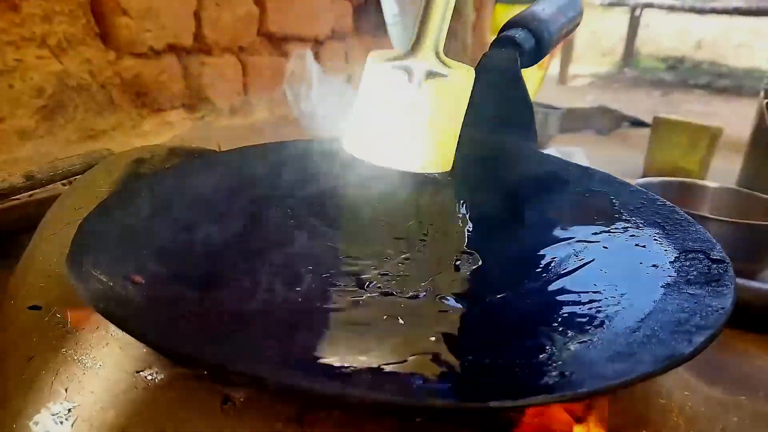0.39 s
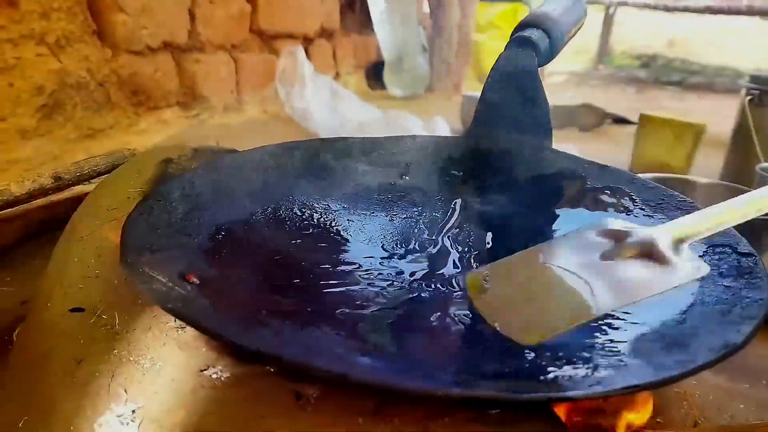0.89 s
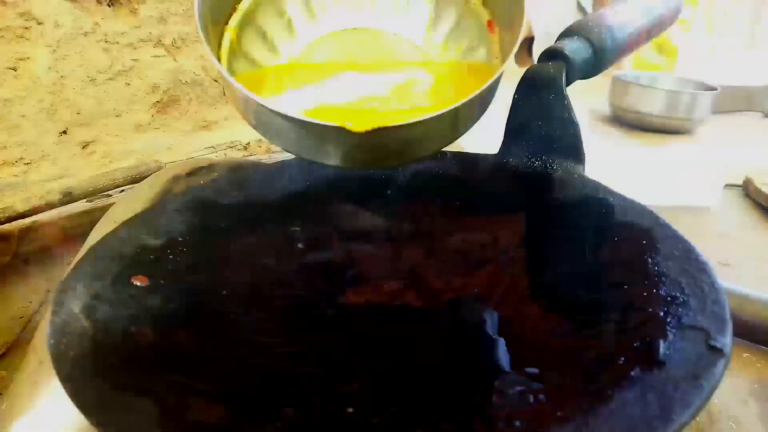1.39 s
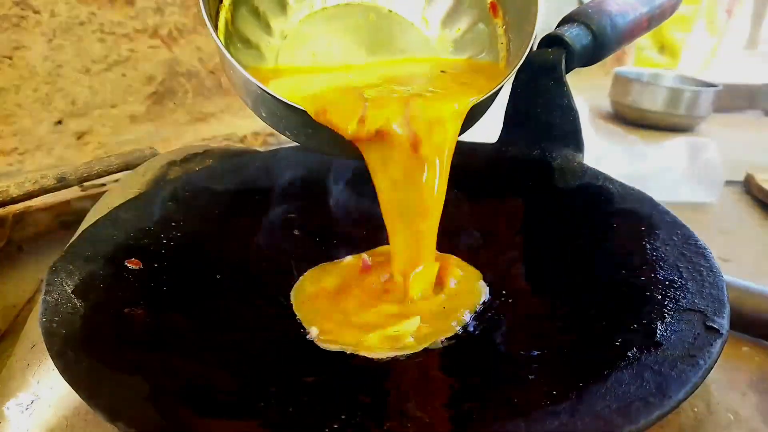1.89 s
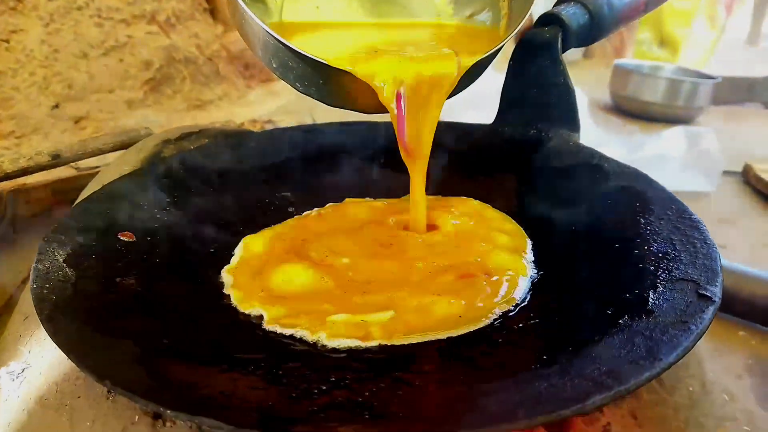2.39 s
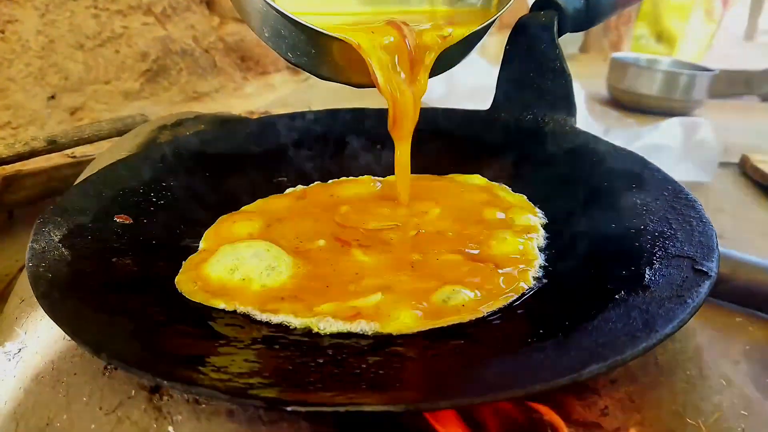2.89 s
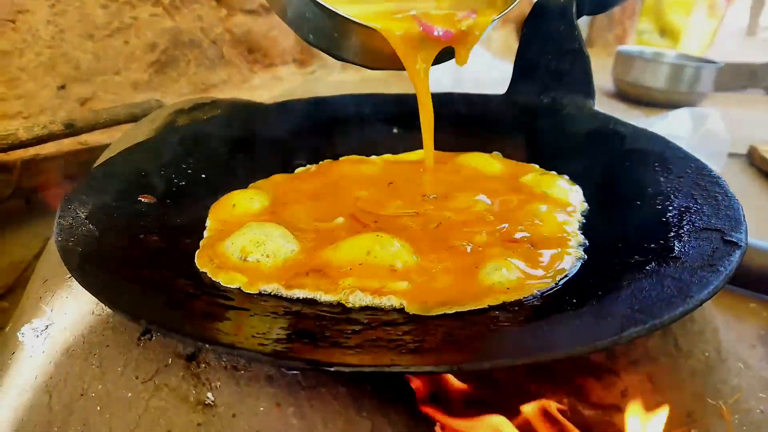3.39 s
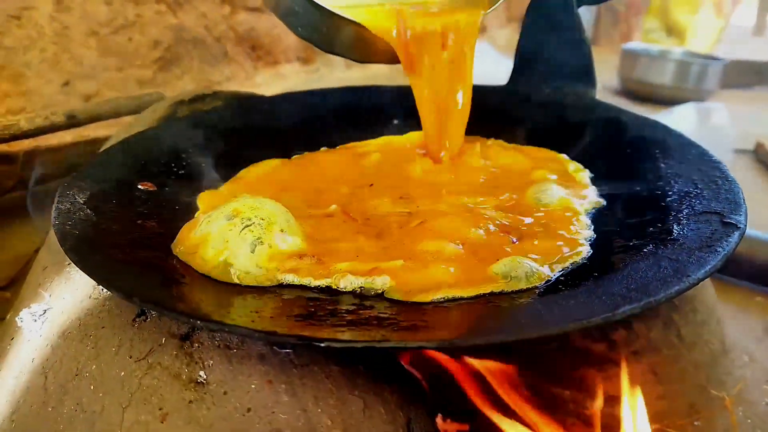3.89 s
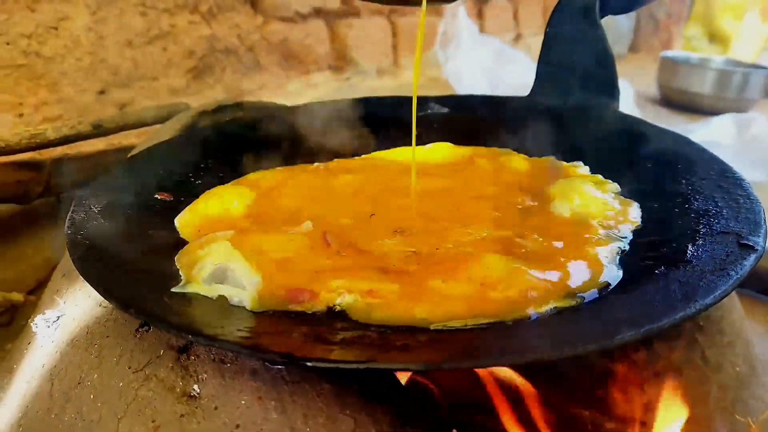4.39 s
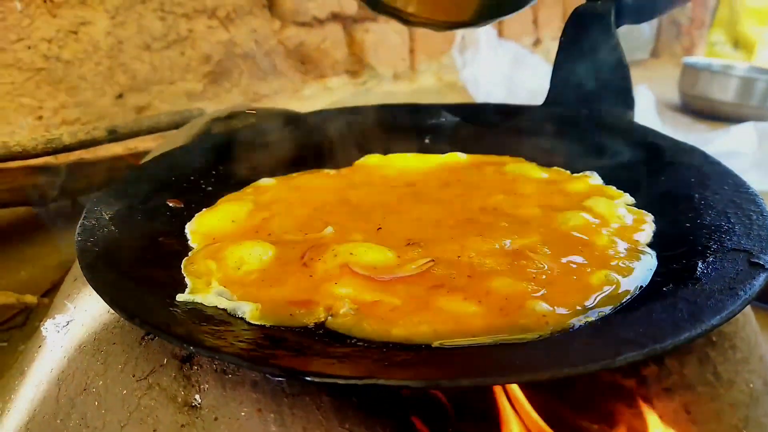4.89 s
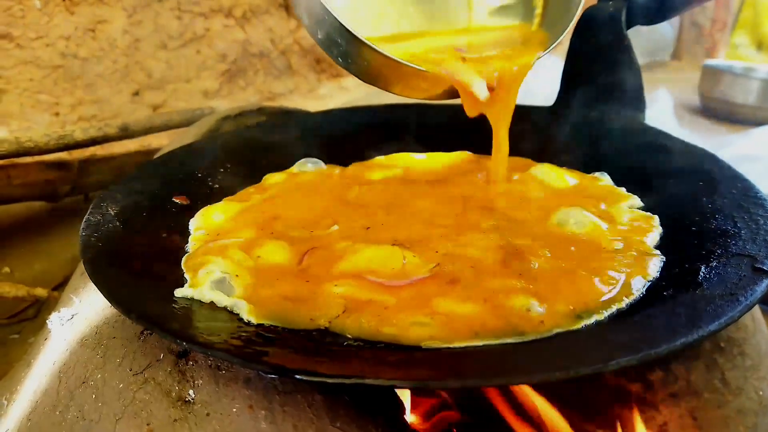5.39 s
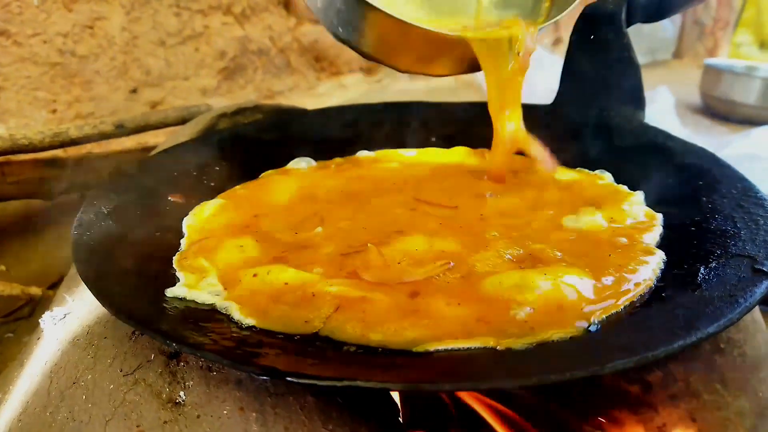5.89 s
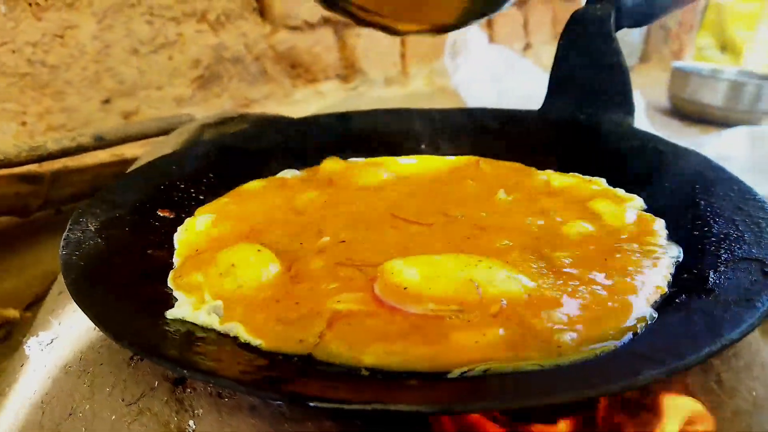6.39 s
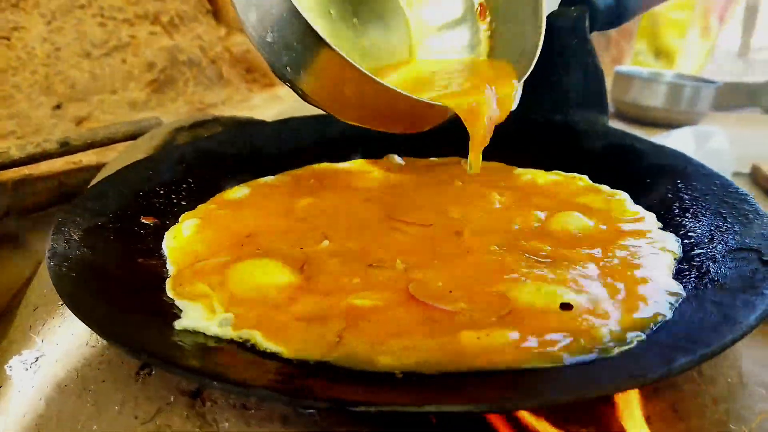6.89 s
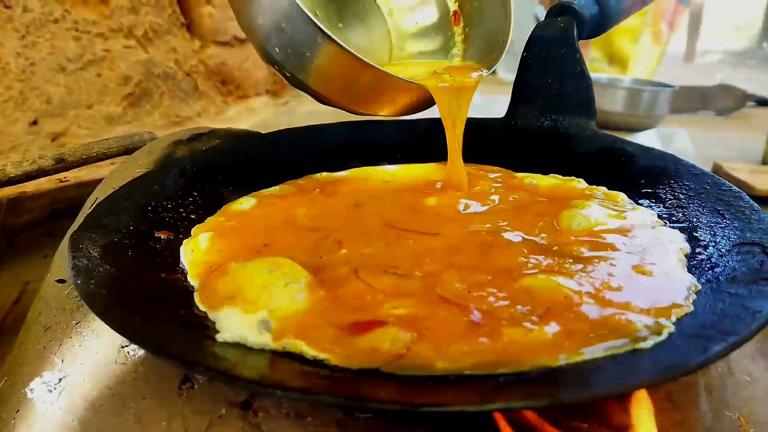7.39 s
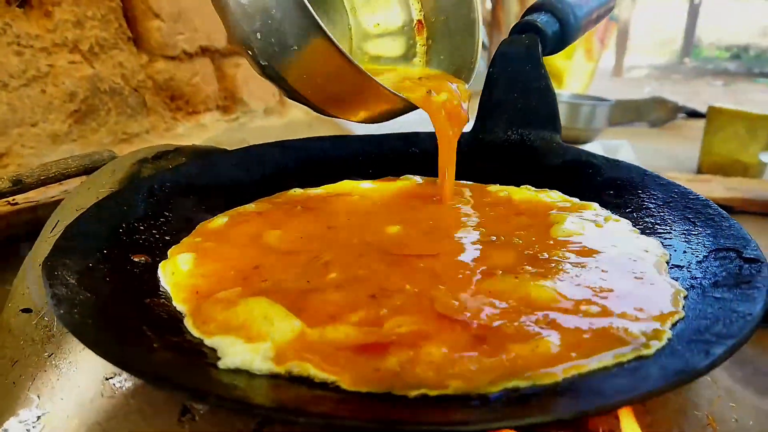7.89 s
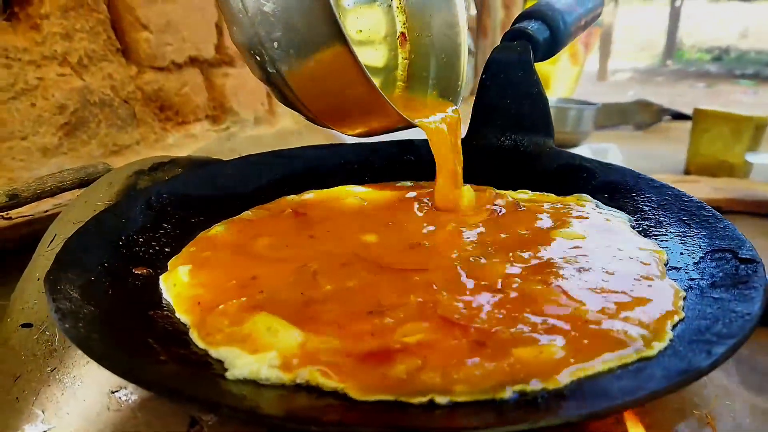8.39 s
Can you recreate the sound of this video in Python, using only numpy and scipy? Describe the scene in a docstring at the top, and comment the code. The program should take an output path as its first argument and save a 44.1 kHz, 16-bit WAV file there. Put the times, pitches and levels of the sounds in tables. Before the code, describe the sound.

A metal spatula scrapes and clanks on an iron pan over fluttering flames, then poured egg sizzles fiercely, crackles and gradually thins out.

```python
"""A steel spatula scrapes and taps a hot oiled iron pan; after a cut, beaten egg is poured on and fries.
The blade is friction clicks and taps ringing steel modes, over a gritty rasp.
Frying is grains of noise for tiny bubbles, ringing pops for larger ones, and sharp snaps for single spits;
it is loud at first, then thins out. Turbulent noise flutters as flames in the fire hole of the wood stove.
Far away a single-cylinder engine thumps, one pulse per firing; a faint dull noise and a breeze lie under."""
import sys
import numpy as np
from scipy import signal
from scipy.fft import rfft, irfft, next_fast_len
from scipy.io import wavfile

SR = 44100
rng = np.random.default_rng(int(sys.argv[2]) if len(sys.argv) > 2 else 0)


def int16_out(signal):
    """Quantize to a 16-bit WAV file."""
    q = np.round(np.clip(np.atleast_2d(signal).T, -1, 1) * 32767)
    wavfile.write(sys.argv[1], SR, q.astype(np.int16))


N = 374850

# Levels in the tables are relative; each source trims its own.
# Spatula strokes, one list each: [t/s, friction into the blade/dB, rasp level/dB, edge squeak level/dB]
STROKES = [
    [(0.0, -38, -30.5, -33), (0.054, -54, -51, -51), (0.102, -57, -54, -40), (0.144, -77, -62, -63),
     (0.28, -80, -62, -72)],
    [(0.285, -99, -80, -80), (0.304, -27.5, -48, -30), (0.344, -36, -52, -48), (0.42, -33, -37, -31.5),
     (0.46, -33, -38, -27), (0.48, -35, -35, -39), (0.524, -41, -31, -23), (0.576, -47, -53, -78),
     (0.64, -71, -61, -62)],
    [(0.645, -74, -73, -64), (0.662, -69, -62, -33.5), (0.708, -72, -66, -70), (0.82, -78, -68, -73)],
    [(0.825, -72, -54, -68), (0.858, -21.5, -30.5, -37), (0.9, -27.5, -32.5, -23), (0.912, -36, -38, -36),
     (0.948, -43, -57, -68)],
    [(0.975, -38.5, -48, -52), (1.024, -35.5, -37, -36.5), (1.152, -37.5, -33, -26), (1.172, -40, -37, -38),
     (1.2, -46.5, -35.5, -25), (1.25, -41, -47, -49), (1.282, -54, -58, -60), (1.352, -78, -63, -59),
     (1.43, -83, -69, -62)],
]
# Blade taps and lifts: [t/s, level/dB, long free modes/dB, short free modes/dB, pan thud level/dB]
TAPS = [(0.0244, -27, 6, -12, -43), (0.0949, -33.5, -3, 3.5, -70), (0.173, -50, -3, 8, -60),
        (0.299, -18.5, -20, -16, -29), (0.515, -18, -11, -4, -33), (0.554, -37, 7, -5, -70),
        (0.657, -46, -12, 19, -70), (0.669, -40.5, -12, 14.5, -74), (0.852, -18, -8, -1, -36.5),
        (0.8825, -16, -12, -4, -43), (1.1465, -30, -21, -18, -55), (1.2586, -36, -4, -10, -42)]
# Modes of the blade pressed on the pan: [f/Hz, level/dB, t60/s when tapped]
PRESSED_MODES = [(1180, 2, .06), (1450, -16, .05), (1651, -6, .22), (1762, -9, .2), (1860, -10, .12),
                 (1996, 0, .25), (2140, -7, .1), (2289, 0, .2), (2439, -10, .12), (2581, -5, .2),
                 (2820, -6, .12), (2975, -8, .15), (3182, -11, .15), (3630, -12, .1), (4108, -9, .12),
                 (4270, -10, .06), (4610, -9, .08), (5020, -11, .08), (5350, -11, .06), (5700, -12, .06)]
# Upper modes of the blade lifted free: [f/Hz, level/dB, t60/s]
FREE_MODES = [(6900, -13, 0.26), (8000, -18, .14), (8660, -8, 0.29), (9660, -1, 0.091), (9800, -16, .14),
              (12040, -3, .1), (14370, -14, .08), (15440, -5, .1)]
# Extra ring of the strongest pressed modes in the early strokes: [t/s, level/dB]
MAIN_MODES = [(.3, 7), (.36, 4), (.5, 1), (.85, -2), (.95, -5), (1.3, -5)]
# The lifted blade rings in two thin high tones whose level wavers: [f/Hz, t60/s, peaks],
# each peak [t/s, level/dB, rise/s per 20 dB; negative means already falling before t]
THIN_TONES = [(3418, .1, [(.07, -57, -0.8), (.11, -58, -1.9), (.53, -43, 0.05), (.55, -47, .03),
              (.575, -45, .05), (.597, -45, .05), (.62, -48, .04), (.7, -52, 0.1), (.735, -51, .06),
              (.77, -50, 0.03), (.8, -51, .06), (.825, -58, .06), (1.266, -54, 0.25), (1.32, -60, 0.2)]),
              (1765, 0.2, [(.04, -54, 3.5), (.52, -36, 0.07), (.674, -55, .03), (1.266, -40, 0.13)])]
# Spectrum of the rasp, also the base of the tap crack and the steam vent: [f/Hz, level/dB per Hz]
RASP_COLOUR = [(900, -51), (1480, -30), (1620, -7.5), (2400, -4.5), (4000, -6.5), (6000, -11.5),
               (7500, -8.5), (9000, -10.5), (11000, -16)]
# Spectrum of the edge squeak: [f/Hz, level/dB per Hz]
SQUEAK_COLOUR = [(7500, -14), (9500, 5.5), (12000, 5.5), (14000, 12.5), (16000, -4)]
# Spectrum of the thud in the pan: [f/Hz, level/dB per Hz]
THUD_COLOUR = [(400, -17), (700, 1), (1150, -5), (1500, 2.5), (2200, -44)]
# Places under the blade: [lead of the left port/samples]
RASP_LAGS = [-8, -2, 2, 9]
# Frying over time: [t/s, fizz level/dB, finest bubbles level/dB, roar level/dB]
FRYING = [(1.44, -62, -63, -64), (1.52, -58.5, -63, -62), (1.62, -59, -56, -57), (1.685, -55, -50, -53),
          (1.71, -45, -39, -48.5), (1.95, -34.5, -40, -37), (2.1, -32.5, -36.5, -35.5),
          (2.22, -30, -32.5, -33.5), (2.4, -33, -33.5, -32), (2.55, -30.5, -31, -33.5),
          (3.0, -35, -32, -34.5), (3.16, -33.5, -31, -32), (3.48, -37, -34, -32.5), (3.7, -37, -35, -33),
          (3.84, -37.5, -36, -32), (4.05, -34.5, -31.5, -34.5), (4.41, -35, -35.5, -37),
          (4.7, -40.5, -36, -40), (4.85, -41.5, -36, -37), (5.2, -41, -36.5, -41),
          (5.55, -41.5, -39.5, -38.5), (5.9, -40, -38.5, -42), (6.68, -42, -39, -46),
          (6.75, -46, -45, -45.5), (6.95, -44, -42.5, -40.5), (7.1, -45, -46, -44.5),
          (7.53, -50.5, -46, -47), (7.56, -43, -37, -45), (7.63, -39, -35, -43), (7.7, -43.5, -38.5, -45),
          (7.866, -47.5, -41.5, -47.5), (8.42, -49.5, -48, -48.5), (8.5, -44.5, -39.5, -48)]
# Spectrum of the fizz: [f/Hz, level/dB per Hz]
FIZZ_COLOUR = [(900, -32), (1500, -2.5), (2000, -3), (2700, -0.5), (4400, -2.5), (5600, -4), (6500, -2),
               (7300, -8.5), (8500, -11), (11000, -12)]
# Spectrum of the finest bubbles: [f/Hz, level/dB per Hz]
FINE_COLOUR = [(6500, -21), (8500, -7.5), (10000, -4), (12000, 2), (14000, 0), (16000, 0.5)]
# Spectrum of the larger bubbles: [f/Hz, level/dB per Hz]
ROAR_COLOUR = [(450, -25), (600, -11), (750, -8.5), (880, -2.5), (960, -5.5), (1250, -2), (1650, -5),
               (2200, -8.5), (5000, -18), (7000, -34)]
# Steam pockets under the egg, and dips between: [f/Hz, width/Hz, level/dB]
POCKETS = [(1004, 80, 5), (1102, 124, 9.5), (1216, 60, -5), (1374, 90, 7.5), (1650, 140, -8.5),
           (1875, 51, 8), (2700, 210, 4)]
# The pockets ring less as the egg sets: [t/s, ringing share]
POCKETS_CLOSE = [(3.7, 1), (3.9, 0.65), (4.6, 0.43)]
# Spits at set times, loud and soft; each sets off a brief burst of fizz:
# [t/s, level/dB, fizz burst/dB, duller body of the snap/dB]
SPITS = [(1.53, -34, 11, -7), (1.6395, -30, 6, -6), (1.6974, -21, 8, -8), (1.8073, -27, 3, -9),
         (1.9974, -21, 1, -7), (2.016, -16, 3, -7), (2.7972, -19, 2.5, -5), (3.0555, -26, -2, -13),
         (3.509, -21, 5.5, -7), (3.5578, -24, 1, -14), (3.801, -29, 5.5, -7), (3.969, -22, 3, -7),
         (4.1944, -23, 3.5, -7), (4.2564, -18, 4, -7), (4.7152, -22, 0, -7), (4.828, -25, 1, -10),
         (4.8838, -18, 9, -9), (5.0903, -28, 5, -7), (5.214, -30, -2, -10), (5.468, -22, -2, -13),
         (5.9434, -27, 2.5, -5), (6.0894, -16, 7.5, -12), (6.1449, -19, 3, -13), (6.1574, -18, 1, -11),
         (6.3697, -28, 2.5, -4), (6.474, -23, 3, -7), (6.641, -22, 5, -9), (6.6583, -26, 2, -9),
         (6.7116, -21, 3, -12), (6.7775, -27, 4.5, -7), (6.8996, -22, 6, -11), (7.0933, -32, 1.5, -7),
         (7.116, -24, 3.5, -10), (7.185, -20, 6, -6), (7.2004, -26, 7, -9), (7.4091, -25, 5, -7),
         (7.439, -24, 6, -10), (7.4624, -22, 10, -4), (7.5007, -25, 4, -6), (7.5394, -19, 3, -13),
         (7.5757, -25, 3, -10), (7.6895, -25, 1.5, -7), (7.9024, -25, -2, -10), (8.016, -15, 11, -4),
         (8.0721, -18.5, -3, -11), (8.095, -20, -1, -9), (8.1743, -33, 2, -11), (8.235, -37, 8, -7),
         (8.3467, -28, 6, -10), (8.3685, -26, 4, -9), (8.4188, -26, 2, -9), (8.4514, -26, 3, -7)]
# A big bubble lets off steam: [t/s, level/dB]
VENT = [(4.15, -68), (4.22, -50), (4.27, -28.5), (4.31, -26), (4.34, -33), (4.4, -33), (4.5, -56),
        (4.6, -66)]
# Resonances of that vent: [f/Hz, width/Hz, level/dB]
VENT_PEAKS = [(1880, 260, 15), (3200, 600, 5), (5000, 1000, 10)]
# Big bubbles burst through the setting egg: [t/s, level/dB, starting f/Hz]
GULPS = [(4.81, -31, 1150), (5.227, -35, 1080), (5.494, -31, 1110), (5.545, -33, 1110), (5.588, -27, 1100),
         (5.591, -32, 1300), (6.68, -32, 1000), (6.947, -36, 1900), (7.845, -36, 1000), (7.885, -38, 1400)]
# Places of the fizz on the pan: [lead of the left port/samples]
FIZZ_LAGS = [1, 5, 9, 10, 14, 18, 20, 25]
# Places of the roar on the pan: [lead of the left port/samples]
ROAR_LAGS = [3, 7, 9, 11, 18]
# Left-right lean of the ports: [f/Hz, left over right level/dB]
PORT_LEAN = [(60, 9), (150, -6), (380, 12), (950, 3.5), (2380, 3.5), (5980, 2.5), (8500, 8.5), (11500, 1),
             (15000, 1)]
# Steady flames: [t/s, level/dB]
FLAMES = [(0, -52), (1.43, -64), (1.5, -64), (1.8, -48), (2.2, -51), (3.41, -43.5), (5.2, -43.5),
          (5.75, -47), (6.47, -43.5), (6.9, -47), (7.3, -47), (8.5, -51.5)]
# Flames flare up: [peak t/s, level/dB]
FLARES = [(0, -37.5), (0.301, -35.5), (.522, -39.5), (.71, -44.5), (.868, -33), (.98, -40.5), (1.06, -44),
          (1.294, -46), (5.14, -50), (7.93, -52), (8.16, -50), (8.48, -52)]
# Short soft low bursts, flame puffs and a bubble at 4.714 s: [t/s, level/dB, f/Hz]
LOW_BURSTS = [(0.041, -16.5, 395), (0.052, -20, 596), (0.118, -26, 475), (0.143, -28, 420),
              (0.169, -28, 520), (0.175, -19, 434), (0.184, -22, 480), (0.255, -23, 443), (0.269, -23, 480),
              (0.281, -23, 550), (0.325, -26, 490), (0.392, -24, 464), (0.707, -27, 467), (0.783, -24, 398),
              (0.859, -32, 405), (0.905, -26, 520), (0.981, -28, 497), (1.05, -33, 480), (1.305, -30, 434),
              (1.396, -34, 470), (2.577, -22, 790), (3.529, -26, 740), (3.542, -20, 420), (4.276, -29, 530),
              (4.714, -23.5, 840), (4.744, -22, 430), (5.493, -25, 440), (6.944, -28, 460),
              (7.921, -26, 444)]
# Spectrum of the fire hole: [f/Hz, level/dB per Hz]
FIRE_HOLE = [(80, -8), (130, -5), (190, -4), (250, -5.5), (340, -4), (420, 2.5), (500, -5.5), (650, -6),
             (1000, -33)]
# Engine speed: [t/s, firing f/Hz]
FIRINGS = [(1.48, 16.9), (2.0, 17.72), (2.5, 17.93), (3.0, 18.39), (3.5, 18.71), (4.0, 18.75), (4.5, 19.02),
           (5.0, 18.85), (5.5, 19.3), (6.0, 19.52), (6.5, 19.38), (7.0, 19.78), (7.5, 19.26), (8.0, 18.33),
           (8.5, 18.02)]
# Exhaust: [t/s, level/dB, pipe f/Hz, upper pipe mode level/dB]
ENGINE = [(1.48, -50.5, 98, -8), (1.58, -56, 97, -11), (1.68, -48, 98, -10.5), (2.0, -46, 101, -6),
          (2.2, -48, 105, -13), (2.35, -50, 118, -12), (2.7, -43.5, 129, -12), (3.0, -45.5, 123, -1.5),
          (3.5, -45, 119, -1.5), (4.3, -43.5, 120, -1), (4.9, -47.5, 127, -1), (5.5, -51.5, 137, -3.5),
          (6.2, -55, 131, -5), (6.8, -58, 125, -7), (7.6, -54, 126, -4), (8.5, -58, 121, -2.5)]
# Spectrum of the dull background noise, strongest around 300-400 Hz: [f/Hz, level/dB per Hz]
DULL_COLOUR = [(35, -55), (60, -83), (207, -40.5), (287, -1), (408, 0), (1620, -9), (3420, -19),
               (3670, -39), (4750, -31), (5720, -52), (16000, -41)]
# Spectrum of air moving over the ports: [f/Hz, level/dB per Hz]
BREEZE_COLOUR = [(25, -8), (42, 0), (65, -10), (120, 12), (300, -25)]
# The dip at the cut between the two shots: [t/s, gain/dB]
CUT = [(0, 0), (1.412, 0), (1.424, -32), (1.438, -32), (1.46, -12), (1.52, 0), (8.5, 0)]

THUD_S = 0.019   # decay of the pan thud
SLIDING_DAMPING = .7   # share of the ring time left while the edge slides
LOW_MODES_SLIDING_DB = -18   # sliding drives the modes under 1.6 kHz less than a tap does
BEND = 2.0   # samples by which the bending blade stretches its ring in time, so the pitch wanders
LONG_MODES_BELOW_HZ = 9000
POPS_PER_S, POP_DB, POP_CYCLES = 300, -8.0, 16   # larger bubbles burst and ring; level against the roar
SPIT_S, FLURRY_S, FADE_IN_S = 0.0011, 0.007, 0.001   # decay of snap and fizz burst; the burst's short fade-in
# small spits at random: rate, then base level over the fine fizz, fizz burst per unit of size, duller body
SMALL_SPITS_PER_S, SMALL_SPIT_DB, SMALL_FLURRY_DB, SMALL_BODY_DB = 50, 9, .4, -13
SNAP_ABOVE_HZ = 12300
TICK_DB, TICK_ABOVE_HZ = 11, 3500   # single tick at the start of a spit, over the spit's level
FLARE_SWELL_S, FLARE_T60_S = 0.047, 0.24   # swell per 20 dB, dying away
LOW_BURST_RISE_S = 0.0022
FIRST_FIRING_S, UPPER_PIPE_HZ, PULSE_RISE_S = 1.481, 186, .0035
ECHO_S, ECHO_DB = .0135, -15   # a wall returns each exhaust pulse; the level wanders about this
DULL_DB, BREEZE_DB = -60.5, -61
TOP_HZ = 15600


def from_db(db):
    """Decibels to gain."""
    return 10 ** (np.asarray(db) / 20)


def rms_one(x):
    """Scales to rms 1."""
    return x / np.sqrt(np.mean(x ** 2) + 1e-20)


def butter(x, order, hz, kind="high"):
    """Butterworth filter, high-pass unless told otherwise."""
    return signal.sosfilt(signal.butter(order, hz, kind, fs=SR, output="sos"), x)


def in_time(tables, outside=None):
    """Joins tables and draws each column after the time as a line with a value per sample."""
    s, *columns = np.transpose(np.vstack(tables))
    return [np.interp(np.arange(N) / SR, s, c, left=outside, right=outside) for c in columns]


def colour(x, points, peaks=(), lean=0):
    """Shapes the spectrum in stereo, with broad peaks and the left-right lean of the ports."""
    size = next_fast_len(N)
    hz = np.maximum(np.arange(size // 2 + 1) * SR / size, 1)

    def read(table):
        f, level = np.array(table).T
        return np.interp(np.log(hz), np.log(f), level)

    db = read(points) + sum(top / (1 + (2 * (hz - f) / width) ** 2) for f, width, top in peaks)
    gain = from_db(db + lean * read(PORT_LEAN) * np.array([[.5], [-.5]]))
    return irfft(rfft(x, size) * gain, size)[..., :N]


def drift(rate):
    """A slow random wander of rms 1: noise, one value per 40 samples, smoothed twice at the rate in Hz."""
    r = np.exp(-80 * np.pi * rate / SR)
    slow = signal.lfilter([1], [1, -2 * r, r * r], rng.standard_normal(N // 40 + 2002))[2000:]
    return np.interp(np.arange(N) / 40, np.arange(len(slow)), rms_one(slow))


def ring(x, hz, t60):
    """A unit click sets a sine of height 1 ringing."""
    r, w = from_db(-60 / (t60 * SR)), 2 * np.pi * hz / SR
    return signal.lfilter([0, np.sin(w)], [1, -2 * r * np.cos(w), r * r], x + 1e-18)


def grains(per_s, spread_db):
    """Random clicks with a long tail of sizes."""
    sizes = from_db(spread_db * np.minimum(rng.exponential(1, N), 4.5)) * rng.choice([-1, 1], N)
    return sizes * (rng.random(N) < per_s / SR)


def over_the_pan(per_s, spread_db, clump_db, lags):
    """Grains from places across the pan, each with its own clumping and its own lag between the ports."""
    out = np.zeros((2, N))
    for lag in lags:
        here = grains(per_s / len(lags), spread_db) * from_db(clump_db * drift(14.0))
        out += [here, np.roll(here, lag)]
    return rms_one(out)


def bursts(rows, decay_s):
    """Clicks at the events, and an envelope that jumps at each and dies away."""
    clicks = np.zeros(N)
    clicks[[round(row[0] * SR) for row in rows]] = from_db([row[1] for row in rows])
    return clicks, signal.lfilter([1], [1, -np.exp(-1 / (decay_s * SR))], clicks)


def rise_and_fall(peak_s, db, rise_s, t60):
    """A level that moves toward its peak time at rise_s per 20 dB and then dies away."""
    t = np.arange(N) / SR - peak_s
    fall_db = np.where(t < 0, -20 * t / rise_s, 60 * t / t60)
    return from_db(db - np.minimum(fall_db, 200))


def soft_pulse(t, rise_s):
    """An envelope that rises to 1 at rise_s and falls away softly."""
    u = t / rise_s
    return u * np.exp(1 - u)


def spatula():
    """Steel on iron: rasp, crack and thud, the blade's modes and thin tones; silent after the cut begins."""
    friction_db, rasp_db, squeak_db = in_time(STROKES)
    clicks, crack = bursts(TAPS, 0.0086)
    out = scrape_and_knock(rasp_db, squeak_db, crack)
    for hz, tone in free_tones() + pressed_tones(friction_db, clicks):
        # each mode reaches one port or the other about a quarter cycle first
        out += [tone, np.roll(tone, round(SR / hz / 4) * rng.choice([-1, 1]))]
    out += thin_tones()
    return out * from_db([[1.2], [-1.2]]) * (np.arange(N) < CUT[2][0] * SR)


def scrape_and_knock(rasp_db, squeak_db, crack):
    """Grit under the edge rasps and squeaks; each tap cracks and thuds in the pan."""
    grit = over_the_pan(6000, 3.2, 3.0, RASP_LAGS)
    out = from_db(rasp_db) * rms_one(colour(grit, RASP_COLOUR))
    out += from_db(squeak_db) * rms_one(colour(grit, SQUEAK_COLOUR))
    _, thud = bursts([(s, thud_db) for s, *_, thud_db in TAPS], THUD_S)
    out += thud * rms_one(colour(over_the_pan(2800, 5.2, 1.3, RASP_LAGS), THUD_COLOUR))
    out += from_db(-10.0) * crack * rms_one(colour(rng.standard_normal((2, N)), RASP_COLOUR))
    return out


def free_tones():
    """Taps and lifts set the upper modes of the free blade ringing."""
    long, short = (bursts([(row[0], row[1] + row[k]) for row in TAPS], 1)[0] for k in (2, 3))
    tones = []
    for hz, db, t60 in FREE_MODES:
        hits = long if hz < LONG_MODES_BELOW_HZ else short
        strike = from_db(-6.5 + 1.1 * drift(9.8)) * hits
        tones.append((hz, from_db(db) * ring(strike, hz, t60)))
    return tones


def pressed_tones(friction_db, clicks):
    """Friction clicks and taps drive the modes of the blade held against the pan."""
    rub = rms_one(grains(6000, 2.9)) * from_db(friction_db - 27.5)
    main_db, = in_time([MAIN_MODES])
    tones = []
    for hz, db, t60 in PRESSED_MODES:
        strength = from_db(db + (db == 0) * main_db)   # the main modes stand at 0 dB
        grip = strength * from_db(3 * drift(14))   # the edge finds each mode unevenly as it slides
        drive = rub * grip * from_db(LOW_MODES_SLIDING_DB * (hz < 1600))
        slide = ring(drive, hz, t60 * SLIDING_DAMPING)
        slide = np.interp(np.arange(N) + BEND * drift(8.0), np.arange(N), slide)
        slide = butter(slide, 6, 1560)   # the sliding blade sounds little below 1.56 kHz
        tap = from_db(-16.0) * ring(clicks * np.sqrt(strength * grip), hz, t60)
        tones.append((hz, slide + tap))
    return tones


def thin_tones():
    """The lifted blade rings in two thin high tones whose level wavers, a quarter cycle apart at the ports."""
    out = np.zeros((2, N))
    for hz, t60, peaks in THIN_TONES:
        level = sum(rise_and_fall(*peak, t60) for peak in peaks) * from_db(1.5 * drift(22.0))
        out += 2 * level * np.sin(2 * np.pi * hz * np.arange(N) / SR + [[np.pi / 4], [-np.pi / 4]])
    return out


def frying():
    """Tiny bubbles fizz, thinning as the pan cools; larger ones roar in steam pockets; single drops spit."""
    fizz_db, fine_db, roar_db = in_time([FRYING], outside=-120)
    spits = all_spits(fine_db)
    return fizz(fizz_db, fine_db, spits) + steam(roar_db) + spit_snaps(spits)


def all_spits(fine_db):
    """Adds small random spits, which follow the finest bubbles in level, to those at set times."""
    size = np.minimum(rng.exponential(1, N), 2)
    spits = list(SPITS)
    for i in np.flatnonzero(rng.random(N) < SMALL_SPITS_PER_S / SR):
        db = fine_db[i] + SMALL_SPIT_DB + 1.37 * size[i]
        spits.append((i / SR, db, SMALL_FLURRY_DB * size[i], SMALL_BODY_DB))
    return spits


def fizz(fizz_db, fine_db, spits):
    """Tiny bubbles burst as grains of noise, denser when loud; each spit sets off a brief burst of fizz."""
    added = [(s, 20 * np.log10(max(from_db(db) - 1, 1e-3))) for s, _, db, _ in spits]
    starts, flurry = bursts(added, FLURRY_S)
    fade_in = signal.lfilter([1], [1, -np.exp(-1 / (FADE_IN_S * SR))], starts[::-1])[::-1]
    flurry = np.maximum(flurry, fade_in)
    per_s = 14000 * from_db(.6 * np.clip(fine_db + 32.5, -25, 5))
    # evened out in power, so that density does not set the level
    bubbles = over_the_pan(per_s, 3.6, 2.5, FIZZ_LAGS) / np.sqrt(per_s / per_s.mean())
    bubbles += 0.54 * rng.standard_normal((2, N))   # the densest part merges into hiss
    body = rms_one(colour(bubbles, FIZZ_COLOUR, lean=0.85))
    fine = rms_one(colour(bubbles, FINE_COLOUR, lean=1.0))
    fine_level = from_db(fine_db + 4.0 + 0.64 * drift(24) + 1.4 * drift(5.8))
    return from_db(fizz_db + 3.0) * (1 + 1.14 * flurry) * body + fine_level * (1 + flurry) * fine


def steam(roar_db):
    """Larger bubbles roar through ringing pockets that close as the egg sets; one big bubble vents."""
    large = over_the_pan(4000, 2.66, 2.9, ROAR_LAGS)
    ringing, = in_time([POCKETS_CLOSE])
    roar = ringing * rms_one(colour(large, ROAR_COLOUR, POCKETS, lean=0.8))
    roar += (1 - ringing) * rms_one(colour(large, ROAR_COLOUR, lean=1.0))
    level = from_db(roar_db - 0.56 + 0.98 * drift(21.0))
    jet = over_the_pan(4500, 1.5, 3.4, FIZZ_LAGS)
    vent = rms_one(colour(jet, RASP_COLOUR, VENT_PEAKS, lean=0.65))
    vent_db, = in_time([VENT], outside=-120)
    return level * (roar + from_db(POP_DB) * pops()) + from_db(vent_db) * vent


def pops():
    """Each larger bubble rings a few cycles at its own pitch and place."""
    born, pitches = grains(POPS_PER_S, 3.0), np.geomspace(1000, 4000, num=16)
    dealt, out = rng.integers(0, len(pitches), N), np.zeros((2, N))
    for k, hz in enumerate(pitches):
        tone = ring(born * (dealt == k), hz, POP_CYCLES / hz)
        lag = FIZZ_LAGS[k % len(FIZZ_LAGS)]
        out += [tone * from_db(3.0), np.roll(tone, lag) * from_db(-2.0)]
    return rms_one(butter(out, 4, 900))


def spit_snaps(spits):
    """A drop spits: a tick, a bright crack with spray, and a duller body of noise."""
    ticks, crack = bursts(spits, .0005)
    _, spray = bursts(spits, SPIT_S)
    _, body = bursts([(s, db + body_db) for s, db, _, body_db in spits], SPIT_S)
    bright = from_db(6) * crack * rng.choice([-1, 1], N)
    bright = bright + from_db(-4) * spray * rng.standard_normal((2, N))
    snap = butter(bright, 2, SNAP_ABOVE_HZ)
    snap += butter(from_db(3.5) * body * rng.standard_normal(N), 2, [2820, 8000], "band")
    snap += from_db(TICK_DB) * butter(ticks * rng.choice([-1, 1], N), 2, TICK_ABOVE_HZ)
    snap[1] = np.roll(snap[1], FIZZ_LAGS[6])
    return snap * from_db([[1.5], [-1.5]])


def gulps():
    """A big bubble rings briefly, rising in pitch as it opens."""
    t, out = np.arange(round(.03 * SR)) / SR, np.zeros(N)
    for s, db, hz in GULPS:
        i = round(s * SR)
        tone = np.sin(2 * np.pi * hz * t * (1 + 5.3 * t))
        out[i:i + len(t)] += from_db(db) * soft_pulse(t, 0.0022) * tone
    return np.array([out * from_db(1.0), np.roll(out, FIZZ_LAGS[2]) * from_db(-3.5)])


def fire():
    """Lumpy turbulence rings the fire hole and flares."""
    lumps = rng.standard_normal(N) * from_db(3.2 * drift(42) + 1.12 * drift(5.7))
    apart = rng.standard_normal((2, N))
    wide = lumps + 0.36 * apart + 0.6 * butter(apart, 2, 480)
    level = from_db(in_time([FLAMES])[0])
    level = level + sum(rise_and_fall(s, db, FLARE_SWELL_S, FLARE_T60_S) for s, db in FLARES)
    return level * rms_one(colour(wide, FIRE_HOLE))


def low_bursts():
    """Short soft low bursts, each at its own pitch with a weaker overtone: flame puffs and one bubble."""
    t, out = np.arange(round(.06 * SR)) / SR, np.zeros((2, N))
    for s, db, hz in LOW_BURSTS:
        i = round(s * SR)
        tone = np.sin(2 * np.pi * hz * t) + 0.32 * np.sin(3.3 * np.pi * hz * t)
        burst = from_db(db - 8.5) * soft_pulse(t, LOW_BURST_RISE_S) * tone
        out[:, i:i + len(t)] += burst[:N - i]
    return out


def engine():
    """One exhaust pulse per firing, uneven in strength and pitch, rings two pipe modes; a wall echoes it."""
    level_db, pipe_hz, upper_db = in_time([ENGINE])
    per_s, = in_time([FIRINGS], outside=0)
    firings = np.cumsum(per_s * (np.arange(N) > FIRST_FIRING_S * SR)) / SR
    at = np.flatnonzero(np.diff(np.ceil(firings)))
    t, out = np.arange(round(.06 * SR)) / SR, np.zeros(N + SR)
    pulse = soft_pulse(t, PULSE_RISE_S)
    for i, (a, b, c) in zip(at, rng.standard_normal((len(at), 3))):
        low = from_db(1.3 * a) * np.sin(2 * np.pi * pipe_hz[i] * (1 + 0.027 * c) * t)
        high_gain = from_db(upper_db[i] + 1.3 * b)
        high = high_gain * np.sin(2 * np.pi * UPPER_PIPE_HZ * (1 + 0.085 * b) * t)
        out[i:i + len(t)] += from_db(level_db[i] + 13.0) * pulse * (low + high)
    pulses = butter(out[:N], 4, 80)
    echo = from_db(ECHO_DB + 3.9 * drift(4.8)) * np.roll(pulses, round(ECHO_S * SR))
    pulses = pulses + echo
    return np.array([pulses, np.roll(pulses, 6)])


def dull_noise():
    """A faint, dull background noise, strongest around 300-400 Hz, independent at the two ports."""
    return from_db(DULL_DB) * rms_one(colour(rng.standard_normal((2, N)), DULL_COLOUR))


def breeze():
    """Moving air rumbles on the ports, partly apart."""
    air = rng.standard_normal(N) + .6 * rng.standard_normal((2, N))
    return from_db(BREEZE_DB + 2.1 * drift(9.7)) * rms_one(colour(air, BREEZE_COLOUR))


def scene():
    """First the spatula on the oiled pan, then the egg, over fire, engine and a dull noise."""
    return spatula() + frying() + gulps() + fire() + low_bursts() + engine() + dull_noise()


def roll_off(x):
    """The treble ends steeply here."""
    return signal.sosfilt(signal.butter(12, 17040, fs=SR, output="sos"), x)


def record(dry):
    """The microphone drops the scene's deep bass and all the top; sound dips at the cut between two shots."""
    x = butter(dry, 4, 84) + breeze()
    x = signal.sosfilt(signal.ellip(10, .5, 40, TOP_HZ, fs=SR, output="sos"), x)
    return roll_off(x * from_db(in_time([CUT])[0]))


dry = scene()
out = record(dry)
int16_out(out)
```